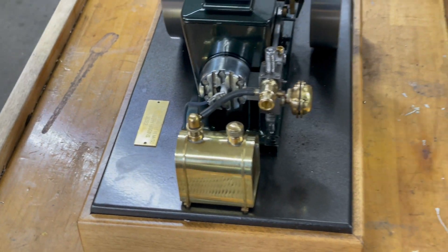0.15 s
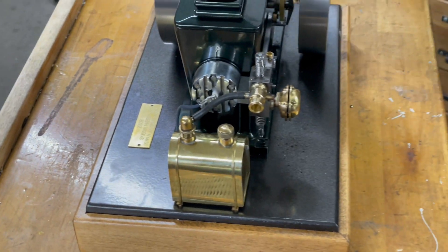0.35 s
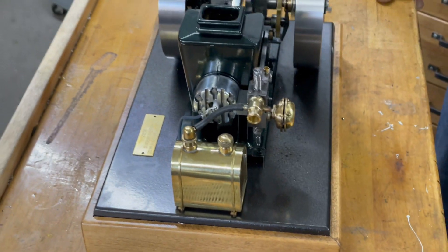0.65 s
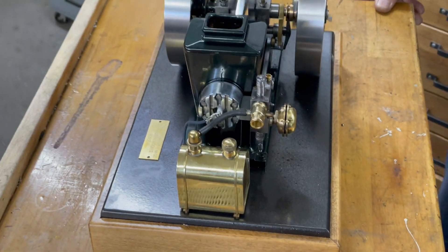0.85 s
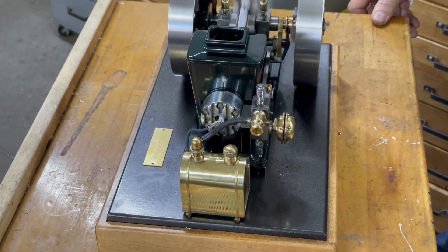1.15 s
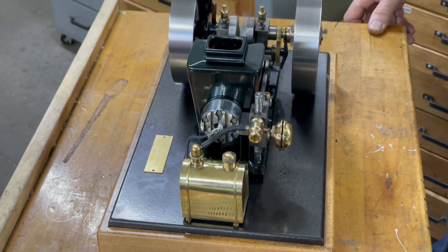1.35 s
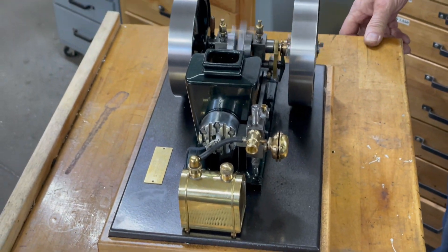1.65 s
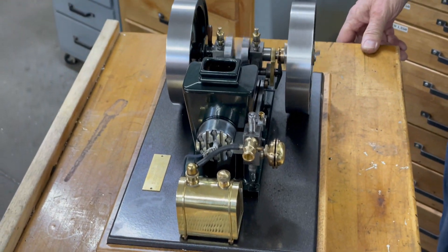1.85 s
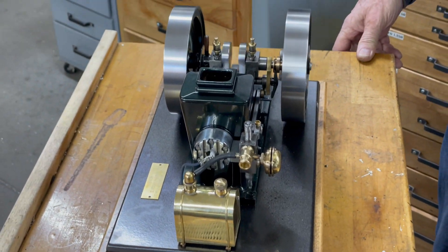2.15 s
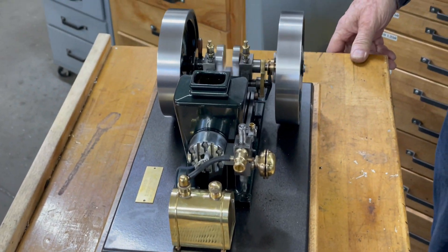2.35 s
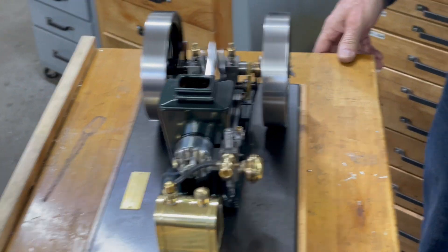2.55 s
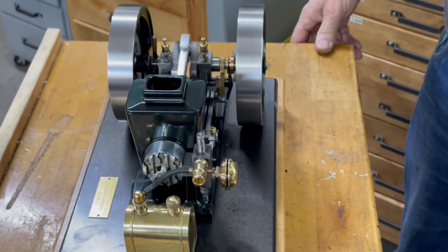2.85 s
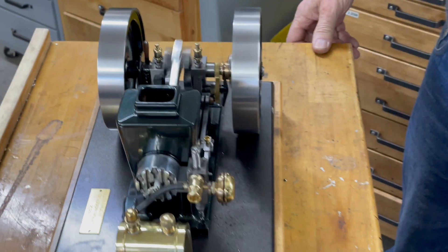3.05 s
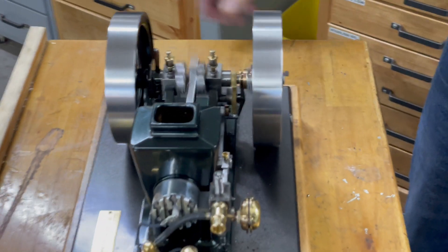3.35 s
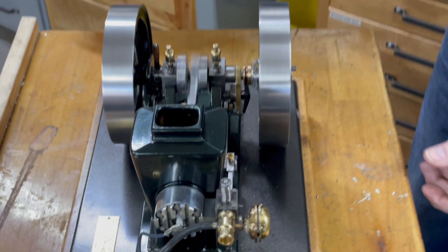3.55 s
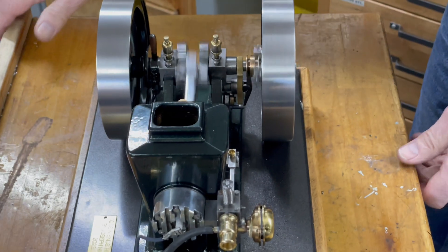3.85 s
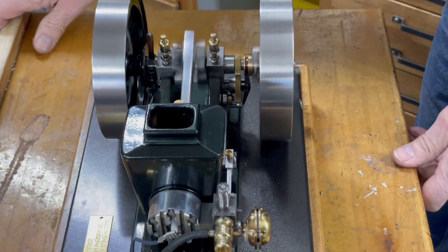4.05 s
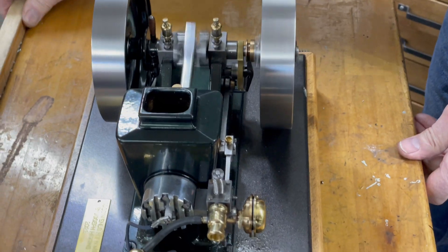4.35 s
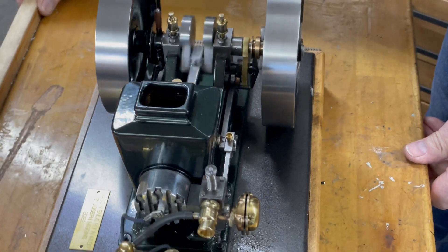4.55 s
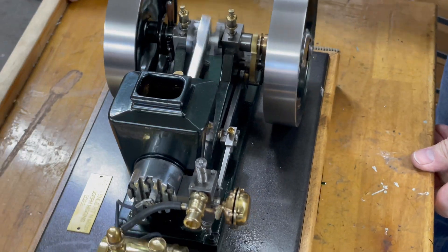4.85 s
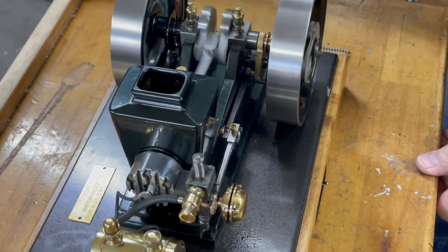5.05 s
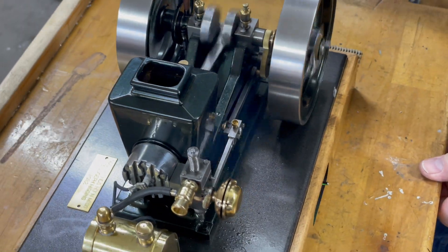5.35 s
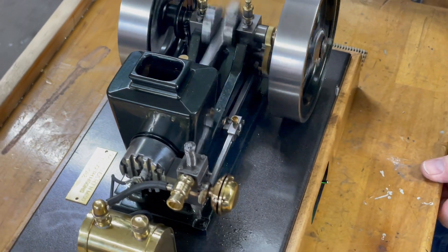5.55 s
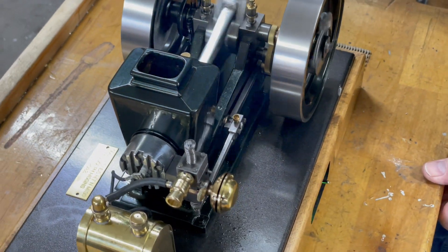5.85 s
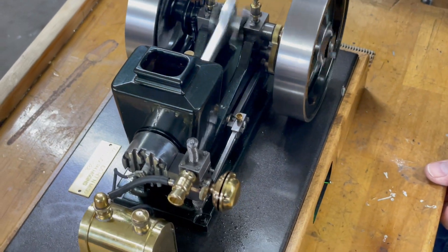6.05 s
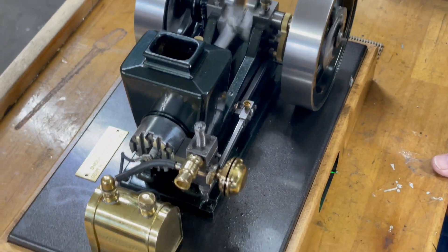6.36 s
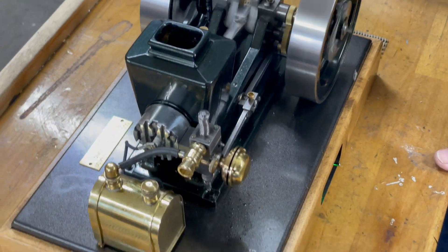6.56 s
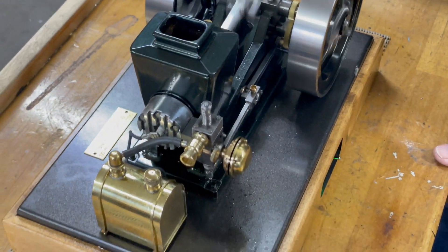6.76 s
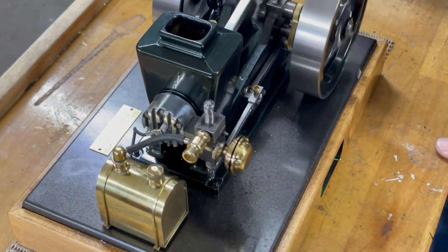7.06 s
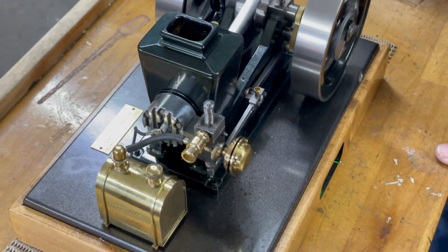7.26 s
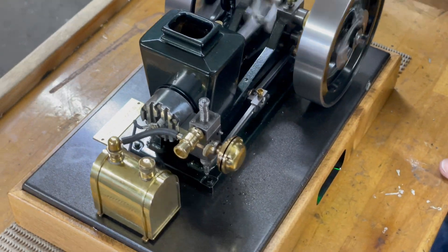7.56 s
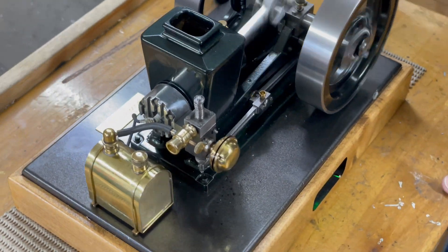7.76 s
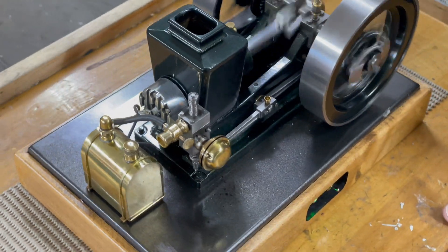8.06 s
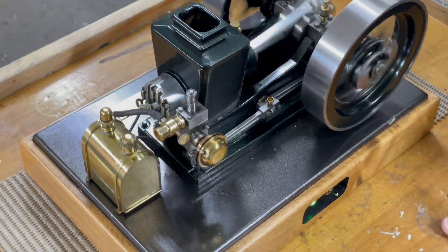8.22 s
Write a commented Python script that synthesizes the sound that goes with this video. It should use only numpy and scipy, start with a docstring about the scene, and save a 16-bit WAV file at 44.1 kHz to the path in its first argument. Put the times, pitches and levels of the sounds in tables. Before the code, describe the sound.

A small hit-and-miss engine runs throughout, very close, on a wooden bench in a lightly echoing workshop. Fast metallic ticks and clacks, a mid-pitched gear whirr and bright rubbing hiss form a steady bed, with airy wheezes at around ten strokes a second while coasting. Loud, dry pops, each a few milliseconds of bright noise with a low thump and short hissing tail, land near 0.4, 1.0, 1.75, 2.3, 3.1 and 3.6 seconds. Before each comes a raspy, fluttering intake gulp and usually a woody knock. Clacks grow stronger from about 3 seconds. Two weak puffs come at 4.4 and 4.6, then the engine slows slightly and fires rapidly, with strong pops at 4.9, 5.1, 5.35, 5.55, 5.75, 6.2 and 6.6 and feeble ones at 6.0 and 6.4. It coasts, pops at 7.2, clatters and wheezes on, puffs faintly at 8.1 and pops again at 8.35, ending still running.

```python
"""A small hit-and-miss engine runs on a wooden bench in a workshop, close to a two-port microphone.
When it fires, the intake valve flutters, the charge may knock and the exhaust pops: noise and low swoops.
Between firings it coasts: the piston pumps air, heard as gated noise, through the held-open valve.
The linkage ticks as short ringing tones, and the gears whirr as noise through narrow resonances."""
import sys
import numpy as np
from scipy import signal
from scipy.fft import rfft, irfft, next_fast_len
from scipy.io import wavfile
from scipy.ndimage import uniform_filter1d

SR = 44100
rng = np.random.default_rng(int(sys.argv[2]) if len(sys.argv) > 2 else 0)


def put_to_file(sound):
    """Save the sound as 16-bit audio at rate SR, in the file named by the first command-line argument."""
    columns = np.atleast_2d(sound).T  # one column per channel
    safe = np.clip(columns, -1, 1)
    whole_steps = np.round(safe * 32767)
    wavfile.write(sys.argv[1], SR, whole_steps.astype(np.int16))


N = 369979  # length in samples
# Levels in the tables are relative: each function sets its own balance on top of them.


def gain_of(db):
    """Turns decibels into a gain."""
    return 10 ** (np.asarray(db) / 20)


def evened(x):
    """Scales a sound to rms 1."""
    return x / np.sqrt(np.mean(x ** 2) + 1e-20)


def read(points, hz, order=1):
    """Reads one column of a table, in straight lines over a log-frequency axis."""
    columns = np.transpose(points)
    return np.interp(np.log(hz + 1), np.log(columns[0] + 1), columns[order])


def add(mix, s, sound):
    """Mixes a sound in at time s."""
    part = mix[max(round(s * SR), 0):][:len(sound)]
    part += sound[:len(part)]


def hiss(points):
    """Makes noise of rms 1 with the spectrum of a table."""
    spectrum = rfft(rng.standard_normal(N))
    spectrum = spectrum * gain_of(read(points, np.fft.rfftfreq(N, 1 / SR)))
    return evened(irfft(spectrum, N))


def resonate(x, peaks):
    """Sends a sound through band-pass resonances side by side and sums them."""
    return sum(gain_of(db) * signal.lfilter(*signal.iirpeak(hz, hz / width, SR), x)
               for hz, width, db in peaks)


def ring(modes, chance, blow_s):
    """One blow sets every mode ringing, a little detuned and uneven; it builds over blow_s; peak 1."""
    t = np.arange(round(max(mode[2] for mode in modes) * SR)) / SR
    out = np.zeros(len(t))
    for (hz, db, t60), (a, b) in zip(modes, chance):
        fading = gain_of(db + 2.5 * a - 60 * t / t60)
        out += fading * np.sin(2 * np.pi * hz * (1 + .02 * b) * t + 2 * a)
    out = out * np.minimum(t / blow_s, 1)
    return out / abs(out).max()


def swoop(top_s, sharp, fall=11.6):
    """A low thump whose pitch falls: half swings lengthen, the more so the smaller fall is."""
    u = np.arange(1, 3000) / SR / top_s  # time, 1 where the thump is strongest
    return (u * np.exp(1 - u)) ** sharp * np.cos(fall * np.log(u / .7))


def wander(per_s):
    """Slow random drift of rms 1; a higher per_s drifts faster."""
    knots = rng.standard_normal(N // 50 + 2)  # one knot every 50 samples
    smooth = uniform_filter1d(knots, max(int(SR / 50 / per_s), 1))
    return evened(np.interp(np.arange(N) / 50, np.arange(len(knots)), smooth))


EDGE_TURN_S = .097  # length of the crank turns before and after the table of cycles
USUAL_TURN_S = 0.088  # turn length at which speed changes no level


def crank():
    """Times with the piston at the top, from one cycle before the first; and which cycles draw a charge."""
    tops = np.array(CYCLES)[:, :2].ravel()
    tops = np.r_[tops[0] - 2 * EDGE_TURN_S, tops[0] - EDGE_TURN_S, tops, tops[-1] + EDGE_TURN_S]
    strokes = np.array(GULPS)[:, 0]
    return tops, [np.any(abs(strokes - s) < EDGE_TURN_S / 2) for s in tops[:-1:2]]


# running noise over time: (start_s, whirr_db, drone_db, rub_db)
RUNNING = [(0.0, -43.5, -43.5, -43.5), (0.9, -42.5, -46.5, -45), (1.9, -43, -47.5, -45),
           (3.0, -41, -46.5, -44.5), (3.9, -42.5, -46, -41.5), (4.4, -41.5, -45, -43),
           (5.1, -46, -51.5, -48), (6.35, -43.5, -48.5, -51), (6.84, -41.5, -49, -44),
           (7.79, -41.5, -46.5, -46), (8.1, -44, -53, -44), (8.38, -47, -43, -41.5)]
# casting resonances heard as gear whirr: (pitch_hz, width_hz, level_db)
GEARS = [(730, 430, 1.5), (863, 360, 1), (1130, 45, -1), (1183, 60, 7), (1250, 350, 3), (1790, 500, -9.5),
         (1960, 97, 0.5)]
# tone colour of rubbing parts: (pitch_hz, level_db)
RUBBING = [(1800, -3), (2800, 4), (4000, 1.5), (5400, 1), (6200, -13), (8000, 0.5), (10000, -10),
           (13500, -10), (16000, -47)]
# rise per doubling of crank speed: (whirr_db, drone_db, rub_db)
SPEED_RISE = (-3, 9.5, 4.5)


def running():
    """Gear teeth excite the casting, the bench drones, sliding parts rub."""
    s, *levels = np.transpose(RUNNING)
    t, tops = np.arange(N) / SR, crank()[0]
    speed = np.log2(USUAL_TURN_S / np.diff(tops))  # in doublings
    fast = np.interp(t, (tops[1:] + tops[:-1]) / 2, speed)
    whirr, drone, rub = (gain_of(np.interp(t, s, db) + rise_db * fast)
                         for db, rise_db in zip(levels, SPEED_RISE))
    shut = np.zeros(N)  # with both valves shut before a pop, the hiss and whirr fall away
    for pop in POPS:
        add(shut, pop[0] - .09, np.linspace(0, 1, round(.09 * SR)) ** 0.19)
    whirr, rub = whirr * gain_of(-3.5 * shut), rub * gain_of(-7.5 * shut)
    teeth = rng.standard_normal((2, N)) * gain_of([4.2 * wander(120), 3.5 * wander(30)])
    bench = resonate(teeth[1], [(342.0, 49, -7.5), (285, 40, -11.0), (456, 45, -17.5)])
    bench = resonate(bench, [(356, 1130, 0)])
    out = whirr * evened(resonate(teeth[0], GEARS)) + drone * evened(bench)
    return out + rub * hiss(RUBBING) * gain_of(3.66 * wander(110))


# the piston pushes or draws air through the exhaust; "busy" means the valves work:
# (middle_of_stroke_crank_turns, coasting_db, busy_db)
PUFFS = [(0.22, -36.5, -79), (0.79, -44, -56), (1.22, -38.5, -59), (1.75, -37.5, -55)]
# resonances of the exhaust port: (pitch_hz, width_hz, level_db)
PORT = [(1200, 500, -14), (2950, 400, 2), (3880, 520, 23), (5200, 420, 18), (13000, 4500, -12)]
PUFF_TURNS, PUFF_DB_PER_SPEED = 0.41, 8  # puff length in crank turns; dB per doubling of speed


def pumping():
    """Air wheezes through the exhaust port, strongest at mid-stroke and at speed, with a soft low push."""
    tops, working = crank()
    angle = np.interp(np.arange(N) / SR, tops, np.arange(len(tops)))  # in crank turns
    gate = np.zeros(N)
    uneven = rng.standard_normal((len(working), len(PUFFS)))
    for k, busy in enumerate(working):
        for (turns, coast_db, busy_db), a in zip(PUFFS, uneven[k]):
            fast = np.log2(USUAL_TURN_S / np.diff(tops)[2 * k + int(turns)])
            middle = 2 * k + turns
            i, j = np.searchsorted(angle, middle + PUFF_TURNS * np.array([-.5, .5]))
            db = (busy_db if busy else coast_db) + PUFF_DB_PER_SPEED * fast + 1.2 * a
            gate[i:j] += gain_of(db) * np.cos(np.pi * (angle[i:j] - middle) / PUFF_TURNS) ** 2
    air = rng.standard_normal(N)
    wheeze = evened(resonate(resonate(air, PORT) + .15 * air, PORT)) * gain_of(2.4 * wander(200))
    push = evened(resonate(air, [(105, 180, 0)]))
    return gate * (wheeze + 0.031 * push)


# one cam cycle is two crank turns:
# (piston_top_s, piston_top_again_s, first_clack_db, second_clack_db, rattle_db)
CYCLES = [(0.03, 0.133, -25, -22.5, -36.5), (0.237, 0.35, -44, -41, -26.5),
          (0.437, 0.538, -26.5, -22, -33.5), (0.629, 0.727, -21.5, -27, -34),
          (0.827, 0.938, -34, -30, -33.5), (1.016, 1.111, -27, -24.5, -35.5), (1.2, 1.292, -25, -27, -35),
          (1.387, 1.487, -24, -41, -38), (1.605, 1.701, -40, -43, -32.0), (1.79, 1.882, -28, -21.5, -36),
          (1.974, 2.068, -25, -27, -35.5), (2.18, 2.281, -39, -30, -32.0), (2.361, 2.448, -30, -28, -36),
          (2.535, 2.623, -23.5, -23.5, -40), (2.719, 2.821, -23.5, -29, -38.5),
          (2.919, 3.034, -35, -42, -32.0), (3.117, 3.202, -17, -18, -34),
          (3.294, 3.39, -20.5, -24.5, -32.0), (3.487, 3.581, -23, -47, -27.5),
          (3.671, 3.76, -21, -17.5, -32.0), (3.849, 3.938, -14.5, -17.5, -36),
          (4.03, 4.127, -18, -19.5, -32.5), (4.229, 4.327, -18.5, -43, -23.5),
          (4.448, 4.563, -18.5, -44, -28.5), (4.696, 4.83, -16, -32.8, -26),
          (4.952, 5.059, -25.5, -30, -32.5), (5.16, 5.275, -26, -32, -41),
          (5.381, 5.488, -23.5, -31, -27.5), (5.592, 5.705, -26.5, -30, -33), (5.807, 5.921, -24, -40, -31),
          (6.032, 6.158, -22, -43, -32.0), (6.255, 6.356, -29, -50, -36), (6.459, 6.562, -22, -34, -25),
          (6.658, 6.748, -20, -18, -32.5), (6.838, 6.93, -16.5, -20.5, -34),
          (7.029, 7.131, -21.5, -28, -29), (7.215, 7.297, -22, -19.5, -31),
          (7.381, 7.468, -19.5, -15.5, -31.5), (7.556, 7.649, -18, -19.5, -32.5),
          (7.743, 7.841, -24.5, -20.5, -34), (7.946, 8.043, -22, -50, -30.5), (8.166, 8.29, -20, -49, -27),
          (8.381, 8.474, -41, -31.5, -41)]
# what clicks at each crank angle, over the rattle level; the last column is added while the valves work:
# (angle_crank_turns, frame_db, rod_db, snap_db, busy_change_db)
STEPS = [(0.51, 2, -3.5, -21, 2), (0.79, -31, -10.5, -46, -22), (1.51, -4, 0.5, -18, -25),
         (1.6, 10.5, 7, -0.5, -12.5), (1.84, -13, 4.5, -13, -8.5), (1.91, 2, -4, 4, -26)]
# clack at the top of the stroke: (rod_db under the frame's level, snap_db over the rattle level)
CLACK = (-8.5, -10.5)
# the first three flaps of each intake stroke click, over the flutter level: (frame_db, rod_db, snap_db)
FLAP_CLICK = (2.5, -3, -6)
# sharp single snaps of governor latch and contact breaker: (start_s, rod_db, snap_db)
TICKS = [(0.109, -48, -35), (0.357, -39, -33), (0.704, -30, -30), (1.273, -29, -29.5), (1.704, -56, -34),
         (2.049, -38, -30), (2.278, -35, -32), (2.606, -29, -28), (3.369, -24, -25), (3.919, -22, -26),
         (4.332, -33, -17.5), (4.387, -32, -27), (4.565, -26, -16), (4.664, -31, -23), (4.79, -37, -24.5),
         (4.83, -30, -20), (6.005, -37, -46), (6.433, -26, -31), (6.91, -27.5, -21.5), (7.45, -40, -22),
         (7.631, -28, -25), (8.049, -38, -24)]
# ringing tones of frame, rods and small bright parts: (pitch_hz, level_db, time_to_fade_60_db_s)
FRAME = [(860, -9, 0.03), (1111, -7, 0.06), (1322, -6, 0.025), (1480, 3, 0.0068), (1650, -2, 0.07)]
RODS = [(2812, 1, 0.017), (3122, -1, 0.019), (3610, -1, 0.017), (4465, -2, 0.015), (5150, -2.5, 0.0073),
        (6455, -4, 0.018), (7040, -6.5, 0.02)]
SNAP = [(5280, 2.5, 0.0051), (8720, 10.5, 0.0037), (9990, 4.5, 0.009), (11680, 5, 0.0061),
        (13460, 2, 0.007), (14700, -2, .005)]
UNEVEN_DB, LOOSE_TURNS = 1.8, .004  # random spread of level, and of angle in crank turns


def linkage():
    """Ticks at crank angles, early valve flaps and random times ring frame, rods and small bright parts."""
    out, (tops, working) = np.zeros(N), crank()
    rows = [(s, -60, rod_db, snap_db) for s, rod_db, snap_db in TICKS]
    for a, b, a_db, b_db, rattle_db in CYCLES:
        for s, db in [(a, a_db), (b, b_db)]:
            rows.append((s, db, db + CLACK[0], rattle_db + CLACK[1]))
    play = rng.standard_normal((len(working), len(STEPS), 4))
    # the cycle before the first borrows the first one's rattle
    for k, (cycle, busy) in enumerate(zip(CYCLES[:1] + CYCLES, working)):
        for (turns, *levels, busy_db), (late, *uneven) in zip(STEPS, play[k]):
            s = np.interp(2 * k + turns + LOOSE_TURNS * late, np.arange(len(tops)), tops)
            step_db = np.add(levels, UNEVEN_DB * np.array(uneven))
            rows.append((s, *(cycle[4] + busy * busy_db + step_db)))
    for (s, hz, _, flutter_db, _), uneven in zip(GULPS, rng.standard_normal((len(GULPS), 3, 3))):
        for flap, u in enumerate(uneven):
            rows.append((s + flap / hz, *(flutter_db + np.add(FLAP_CLICK, 2 * UNEVEN_DB * u))))
    # faint ticks at random times
    for s, a, b, c in np.c_[rng.random(250), rng.standard_normal((250, 3))]:
        rows.append((s * N / SR, -45 + 4 * a, -42 + 4 * b, -45 + 5 * c))
    rows = [row for row in rows if 0 <= row[0] < N / SR]
    chances = rng.standard_normal((len(rows), 3, len(RODS), 2))
    for (s, frame_db, rod_db, snap_db), chance in zip(rows, chances):
        add(out, s, gain_of(frame_db - 1.5) * ring(FRAME, 0.4 * chance[0], 0.00023))
        add(out, s, gain_of(rod_db + 3.5) * ring(RODS, chance[1], 0.0003))
        add(out, s, gain_of(snap_db + 7.5) * ring(SNAP, chance[2], 0.00017))
    return out


# intake strokes; the length is without the lead-in and tail that every stroke gets:
# (start_s, flutter_hz, gulp_db, flutter_db, length_s)
GULPS = [(0.249, 80, -34, -30.5, 0.029), (0.834, 77.8, -36, -30.5, 0.038),
         (1.599, 78.6, -37.5, -34.5, 0.051), (2.176, 77.6, -35.5, -33, 0.053),
         (2.926, 94.3, -37.5, -30.5, 0.027), (3.495, 73.3, -34, -30, 0.025), (4.237, 80.8, -37, -29, 0.036),
         (4.466, 80.1, -37, -32.5, 0.018), (4.711, 81, -39.5, -35.5, 0.055), (4.964, 77, -44.5, -42, 0.03),
         (5.171, 84, -39, -40, 0.055), (5.401, 77.7, -44, -41, 0.038), (5.61, 80, -47, -45, 0.019),
         (5.825, 79.7, -42.5, -41, 0.044), (6.043, 81.2, -37.5, -32.5, 0.038),
         (6.264, 85.5, -45, -36.5, 0.025), (6.475, 80.8, -38.5, -36, 0.032),
         (7.036, 73.3, -37.5, -31.5, 0.038), (7.951, 81.3, -35, -33.5, 0.048),
         (8.183, 81.8, -40, -35.5, 0.024)]


def intake():
    """Suction makes the light valve flutter: it whistles over a rasp, and five low gulps open each stroke."""
    low, rough, high = np.zeros((3, N))
    air = rng.standard_normal(N)
    lips = [(1330, 260, 1), (1690, 470, 60)]  # Hz, width Hz, dB
    whistle = evened(resonate(resonate(air, lips), lips)) + .5 * hiss(RUBBING)
    for (s, hz, gulp_db, flutter_db, length), chance in zip(GULPS, rng.standard_normal((len(GULPS), 5))):
        t = np.arange(round((length + 0.029) * SR)) / SR - .008
        stroke = np.sin(np.pi * np.linspace(0, 1, len(t)) ** 0.44)
        flaps = .3 + np.exp(4 * (np.cos(2 * np.pi * hz * t) - 1))
        add(high, s - .008, gain_of(flutter_db) * stroke * flaps)
        add(rough, s, gain_of(gulp_db - 9) * stroke)
        for flap, a in enumerate(chance):  # later gulps are weaker on average
            gulp = gain_of(gulp_db + 6.5 - 4.1 * flap + 3.5 * a) * swoop(0.01055 * (1 + 0.035 * a), 4.1)
            add(low, s - .004 + flap / hz, gulp)
    throat = resonate(resonate(air, [(152, 88, -1.6), (345, 110, 0.15)]), [(181, 530, 0)])
    return low + rough * evened(throat) + high * whistle


# knocks as the charge ignites, some of them weak: (start_s, level_db)
KNOCKS = [(0.358, -19), (0.938, -17.5), (1.706, -17.5), (2.279, -17), (3.031, -17.5), (3.592, -18),
          (4.331, -40), (4.829, -31.5), (7.133, -20.5), (8.292, -23.5)]
# ringing tones of the bench: (pitch_hz, level_db, time_to_fade_60_db_s)
BENCH = [(136, -11, 0.028), (345.4, 5.5, 0.034), (379.5, -6.5, 0.15), (548, -8, 0.12), (717, 2, 0.038)]


def ignition():
    """Some firings start with a low knock of the bench, followed by a soft low swing."""
    out = np.zeros(N)
    for (s, db), chance in zip(KNOCKS, rng.standard_normal((len(KNOCKS), len(BENCH), 2))):
        add(out, s, gain_of(db) * ring(BENCH, 0.12 * chance, 0.0042))
        add(out, s + 0.0045, gain_of(db - 14) * swoop(0.0128, 1.6))
    return out


# the exhaust valve opens: (start_s, jet_db, thump_db, outflow_db, treble_db, whistle_hz)
POPS = [(0.405, -2.5, -20.5, -31, -1, 4460), (0.9828, 1, -23.5, -28, -5.5, 4340),
        (1.7528, 2.5, -23.5, -25.5, -5.5, 4250), (2.3216, 1, -22, -25.5, -4, 5070),
        (3.076, 2, -23.5, -24, -3.5, 5130), (3.6364, 1, -22.5, -30, -2.5, 5000),
        (4.3923, -16.5, -38, -37, -8, 3150), (4.632, -11, -38.5, -43, -9, 2930),
        (4.8994, 0.5, -21, -30, -0.5, 3540), (5.1188, 0.5, -19, -29.5, 2, 3440),
        (5.3353, 4, -19.5, -27.5, -4.5, 6240), (5.5457, 0.5, -17.5, -34.5, 2, 3220),
        (5.7612, 2, -19.5, -28, -1.5, 2970), (5.9779, -14.5, -35.5, -53, -22, 2770),
        (6.2135, 2, -23, -27.5, -4, 6530), (6.4085, -16.5, -33.5, -36.5, -10, 2800),
        (6.6168, 2.5, -20, -29.5, -1.5, 5070), (7.1751, 1.5, -23.5, -30, -5, 5030),
        (8.108, -18.5, -40, -45, -1, 2970), (8.3391, 0.5, -26.5, -27.5, -5, 3400)]
# muffler resonances: (pitch_hz, width_hz, level_db)
MUFFLER = [(3060, 99, 6), (4780, 1000, -0.5), (6210, 300, -1), (11200, 530, -3), (14200, 700, 1)]
# tone colour of the first jet, then of the gas flowing out: (pitch_hz, level_db)
JET = [(300, -52), (600, 1.5), (1000, -6), (2000, -2), (4000, 4.5), (7000, -1.5), (10000, 0), (14000, 3.5),
       (16000, 5.5)]
OUTFLOW = [(200, 13), (800, -14), (2000, -2.5), (3200, 1.5), (5300, 3.5), (7500, 1.5), (10000, -2),
           (12500, -2.5), (14100, -0.5), (15500, -6)]


def exhaust():
    """A short jet through the muffler, a thump that shakes the bench, then the gas hisses out."""
    t, out = np.arange(SR // 3) / SR, np.zeros(N)
    air, flow = hiss(JET), hiss(OUTFLOW)
    jet = evened(air + 0.83 * resonate(air, MUFFLER)) * gain_of(2.2 * wander(900))
    flow = evened(flow + .5 * resonate(flow, MUFFLER)) * gain_of(2.5 * wander(150))
    burst_db = np.interp(t, [0, .003, .004, .0076, .0104, .02], [-30, -13, 0, -1, -18, -80])
    opening = np.clip((t - .003) / 0.004, 0, 1)
    chances = rng.standard_normal((len(POPS), len(BENCH), 2))
    for (s, jet_db, thump_db, flow_db, treble_db, hz), chance in zip(POPS, chances):
        part = slice(round(s * SR) - len(t), round(s * SR))  # another stretch of noise for each pop
        gas = jet[part] * gain_of(jet_db - 11 + burst_db)
        gas += flow[part] * gain_of(flow_db - 60 * t / 0.39) * opening
        treble = resonate(gas, [(13700, 15000, 0)])
        whistle = resonate(gas, [(hz, 500, 0)])
        add(out, s - .003, gas + (gain_of(treble_db) - 1) * treble + 0.92 * whistle)
        add(out, s - .0005, gain_of(thump_db + 9) * swoop(.0072, sharp=3.3, fall=7.4))
        add(out, s + 0.0049, gain_of(thump_db - 17) * swoop(0.022, sharp=9))  # the cylinder draws back
        add(out, s + .004, gain_of(thump_db - 11) * ring(BENCH[:3], chance, .014))
    return out


# how the room echoes: (pitch_hz, time_to_fade_60_db_s, level_db)
ECHO = [(100, 0.12, -30.5), (780, 0.35, -5.5), (2520, 0.21, -26), (5700, 0.32, -13.5), (15000, 0.11, -22.5)]


def workshop(x):
    """Sparse reflections, other ones at each port, each band dying at its own speed."""
    taps = np.zeros((2, SR // 2))
    at = np.arange(200, SR // 2 - 20, 20)  # one reflection in every 20 samples
    at = at + rng.integers(0, 20, (2, len(at)))
    np.put_along_axis(taps, at, rng.choice([-1., 1.], at.shape), 1)
    hz, t, z = signal.stft(taps, SR, nperseg=256)
    dying = gain_of(-60 * t / read(ECHO, hz)[:, None])
    dying *= (gain_of(read(ECHO, hz, order=2)) / np.linalg.norm(dying, axis=1))[:, None]
    tail = signal.istft(z * dying, SR, nperseg=256)[1] * np.sqrt(20 / 128)
    return signal.fftconvolve(x[None], tail, axes=1)[:, :N]


# tone colour of the quiet shop air: (pitch_hz, level_db)
SHOP = [(30, -36), (60, -26), (110, 9), (250, -30), (2000, -47), (16000, -50)]
SHOP_DB = -60.5
# the two ports: (pitch_hz, right_leads_by_radians, left_minus_right_db)
PORTS = [(60, 0, -1), (200, -.2, -2), (1000, -.45, -.3), (2000, -.15, .1), (3100, -.5, .1), (5200, -.7, .2),
         (6200, 1.1, .1), (7300, 1.5, -.5), (8600, 3.1, .1), (12000, 5.2, -.2), (14000, 6.3, 0),
         (15500, 6.6, 0)]


def scene():
    """The engine reaches the two ports with a shift that varies with pitch; echoes and shop air differ."""
    engine = exhaust() + ignition() + intake() + linkage() + pumping() + running()
    size = next_fast_len(N + 2000)
    hz = np.fft.rfftfreq(size, 1 / SR)
    # half of the shift and level goes to the left, the opposite half to the right
    half = gain_of(read(PORTS, hz, order=2) / 2) * np.exp(-.5j * read(PORTS, hz))
    direct = irfft(rfft(engine, size) * np.array([half, 1 / half]), size)[:, :N]
    air = hiss(SHOP) + 0.46 * np.array([hiss(SHOP), hiss(SHOP)])  # shared air, then each port's own
    return direct + workshop(engine) + gain_of(SHOP_DB) * air


EDGE_HZ, OVERLOAD = 15700, .75  # top of the band; level that the soft overload never passes


def record(dry):
    """The capsule drops the deepest bass and the loudest pops overload softly; then the band limit."""
    thin = signal.sosfilt(signal.butter(3, 48, "high", fs=SR, output="sos"), dry)
    soft = OVERLOAD * np.tanh(thin / OVERLOAD)
    band = signal.firwin(511, EDGE_HZ, window=("kaiser", 9), fs=SR)
    return signal.oaconvolve(soft, band[None], "same")


dry = scene()
out = record(dry)
put_to_file(out)
```